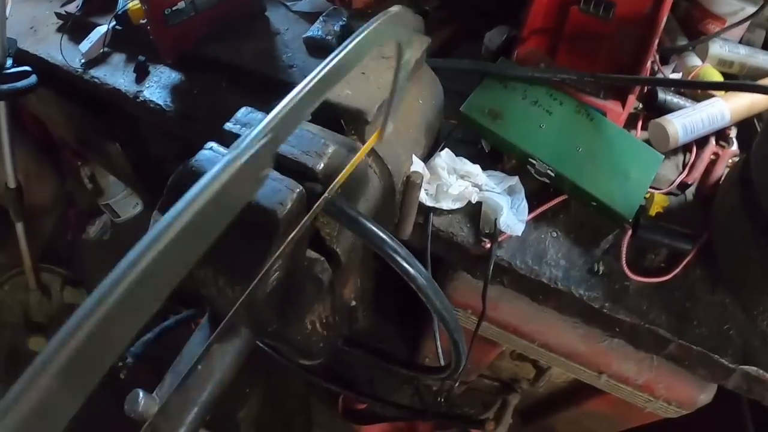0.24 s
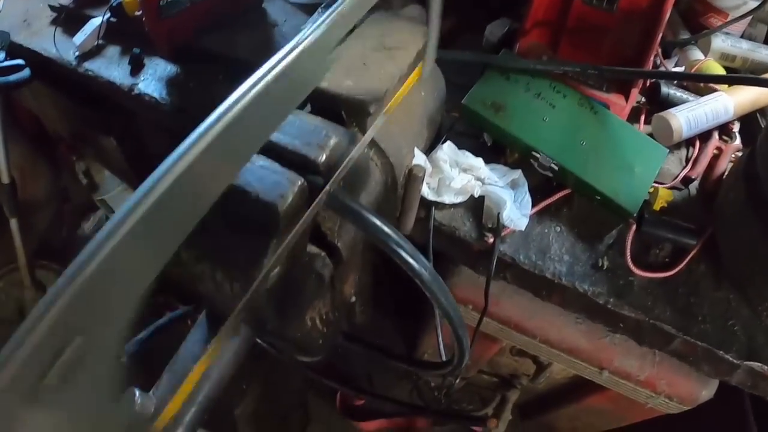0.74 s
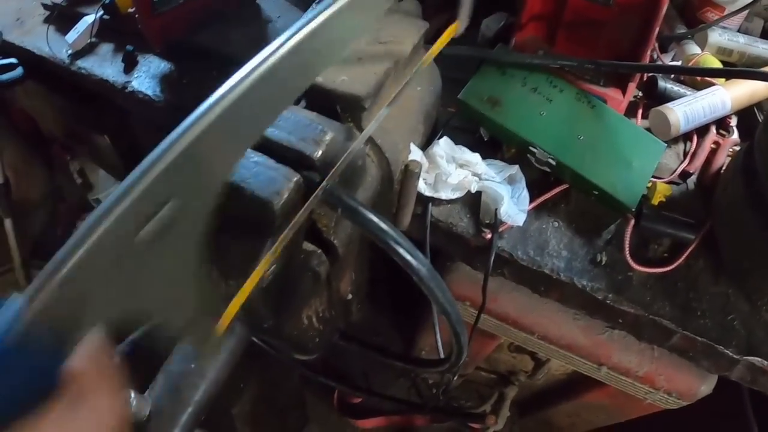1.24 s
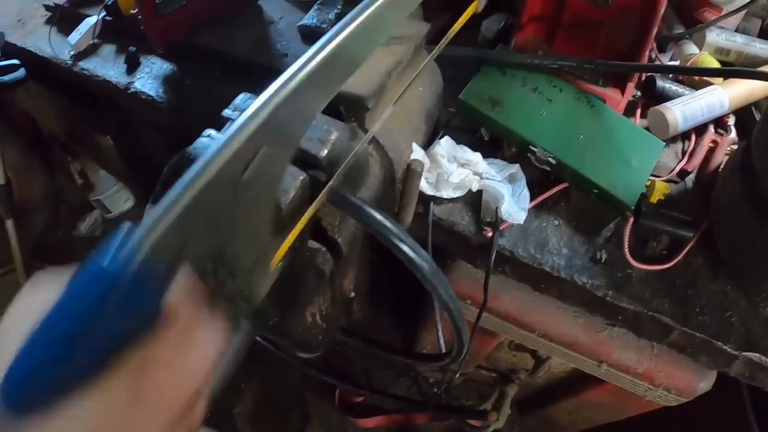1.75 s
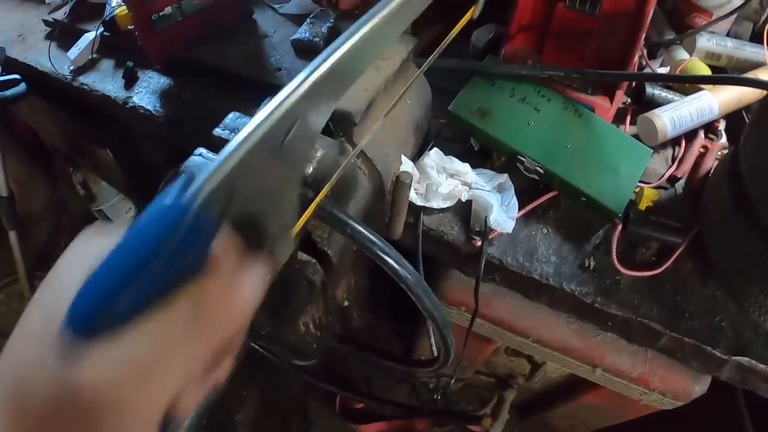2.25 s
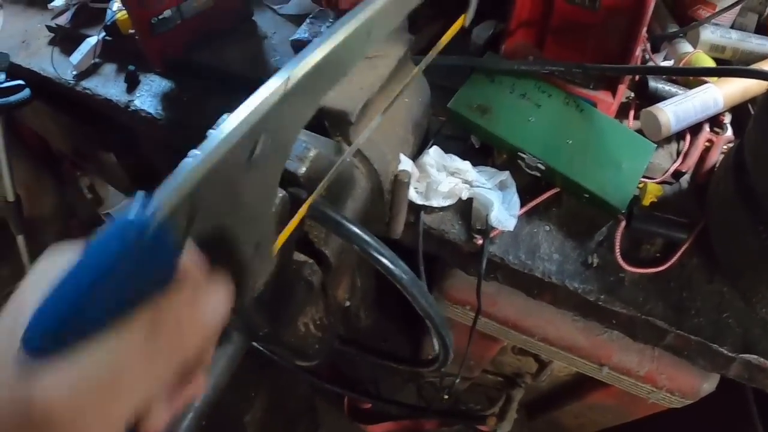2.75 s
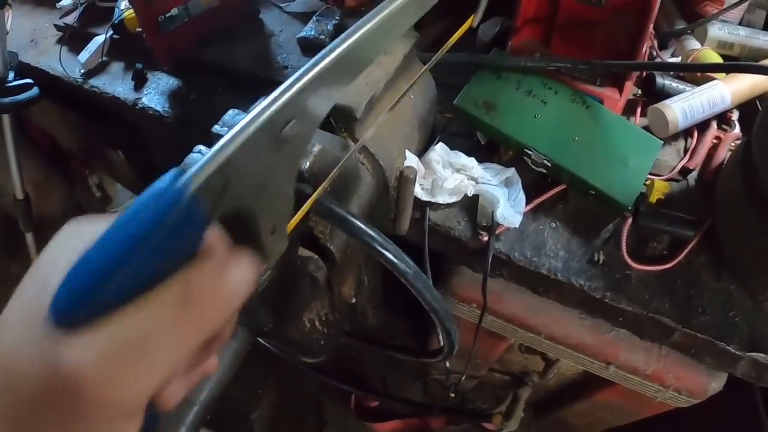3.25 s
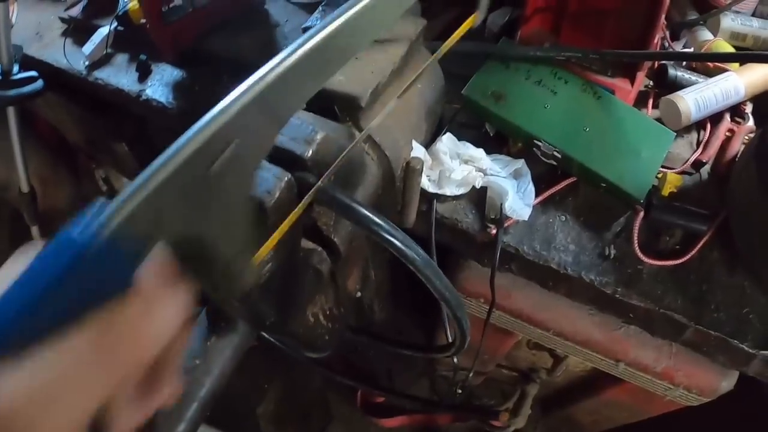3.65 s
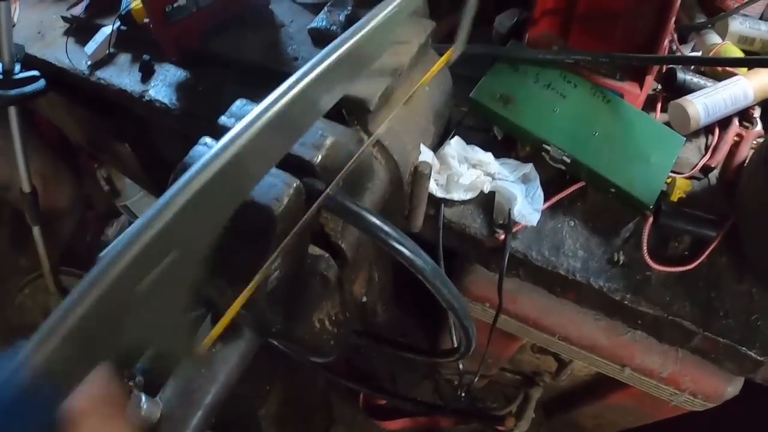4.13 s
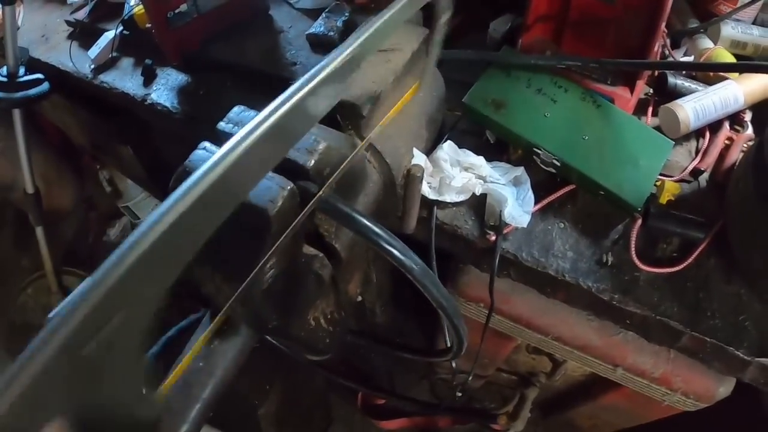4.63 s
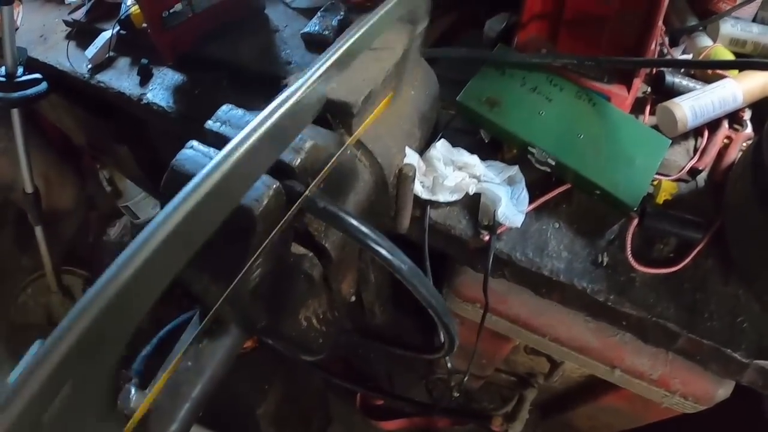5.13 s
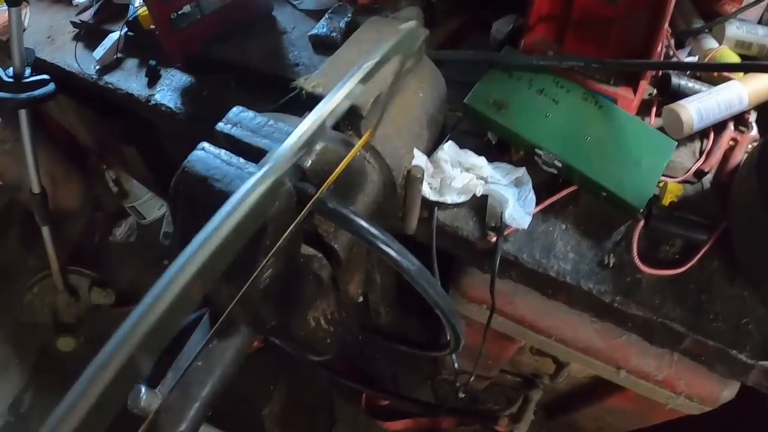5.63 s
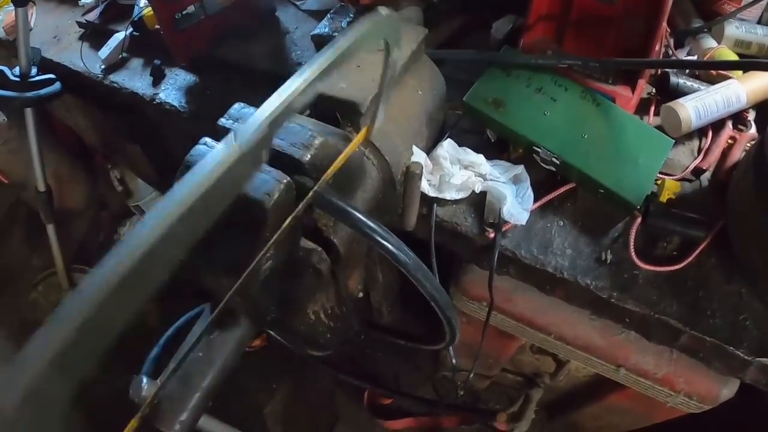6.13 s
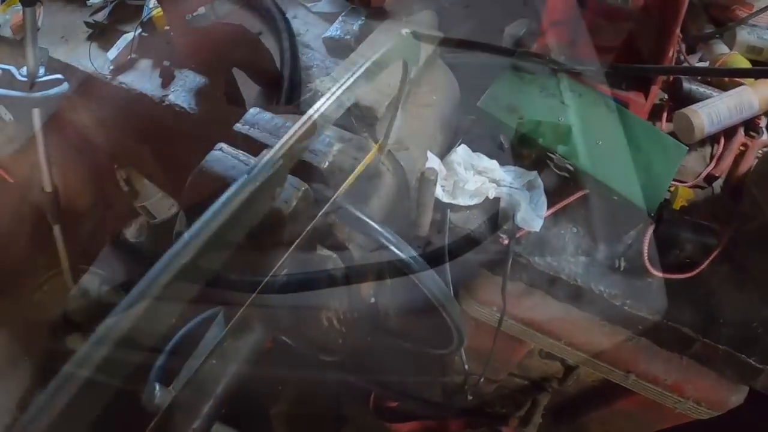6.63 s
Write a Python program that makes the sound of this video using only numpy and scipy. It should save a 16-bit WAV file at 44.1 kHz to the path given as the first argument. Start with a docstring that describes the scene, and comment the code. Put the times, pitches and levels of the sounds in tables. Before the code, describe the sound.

Rapid alternating hacksaw strokes, close and nearly centred, with coarse toothy noise and a singing metallic tone that swells mid-stroke and turns hoarse as it slows. Small snags roughen some pushes; low grinding and shuddering come from the vise and bench. After more than six seconds the sawing breaks off with a low bump, then a flurry of muffled knocks, in a short dry room with faint air.

```python
"""A singing, rasping pull of a hacksaw, then push after pull through a thick cable in a vise, close by in a small workshop.
Each stroke speeds up and slows: noise bursts and partials follow the tooth rate through resonances of blade and frame.
Low noise grinds and rumbles in the bench, and damped sines sway it at the grabs and stalls.
At the end the saw rests; low ringing modes and filtered noise make the dull knocks of handling, one faint knock earlier.
Two microphone channels share the middle; the faces of the blade, the walls and the air spread between them."""
import sys
import numpy as np
from scipy import signal
from scipy.fft import rfft, irfft, next_fast_len
from scipy.io import wavfile
from scipy.ndimage import uniform_filter1d

SR = 44100
rng = np.random.default_rng(int(sys.argv[2]) if len(sys.argv) > 2 else 0)


def wav_record(signal):
    """Record a signal, one row per channel, as 16-bit PCM in the file named by sys.argv[1]."""
    frames = np.transpose(np.atleast_2d(signal))
    bounded = np.clip(frames, -1, 1)
    # unit amplitude maps onto the largest positive 16-bit level
    quanta = np.round(bounded * 32767).astype(np.int16)
    wavfile.write(sys.argv[1], SR, quanta)


N = 303408
TIME = np.arange(N) / SR

# resonances and notches of the tensioned blade and its frame: centre_hz, width_hz, rise_db
BLADE_MODES = [(230, 31.5, 8.5), (329, 26, -26), (418, 38, 12.5), (444, 62, -5.5), (670, 42, 9.5),
               (937, 14, 5.5), (1217, 20.4, 14), (1417, 170, -4), (1670, 117, 2), (1819, 53, 6.5),
               (1980.4, 37, 21.5), (2234, 28.4, 14.5), (2522, 66.5, 12.5), (2625, 58, 8), (3470, 66, 6),
               (3707, 150, 6.5), (4453, 570, 8), (5580, 62, 7), (6005, 83, 5.5), (7744, 334, 10.5),
               (9680, 1010, 9.5), (12860, 1840, 7.5)]
# forward strokes, levels before later shading:
# start_s, fastest_s, end_s, top_tooth_rate_hz, pressure_db, singing_db, squeal_db, bench_jolt_db
PUSHES = [(0.208, 0.332, 0.46, 1684, -24.5, -3.5, -10, -39),
          (0.742, 0.895, 1.046, 1656, -25.5, -10, -7.5, -28),
          (1.29, 1.433, 1.597, 1384, -23.5, -9.5, -9, -38), (1.833, 1.968, 2.11, 1611, -22, -2, -5.5, -32),
          (2.355, 2.481, 2.658, 1746, -25.5, -1, -6.5, -43),
          (2.866, 2.998, 3.15, 1654, -24, -4.5, -6.5, -47), (3.386, 3.534, 3.656, 1739, -24, -3, -13, -32),
          (3.907, 4.069, 4.182, 1627, -25.5, -8, -9, -38), (4.446, 4.586, 4.688, 1886, -27, -0.5, -3, -69),
          (4.963, 5.089, 5.253, 1749, -25, -6, -7.5, -29.5),
          (5.482, 5.635, 5.754, 1725, -24, 0.5, -3.5, -31.5),
          (6.021, 6.167, 6.36, 1706, -27, -1.5, -5, -37), (6.57, 6.627, 6.712, 700, -24, -17, -10, -59)]
# return strokes, likewise: start_s, fastest_s, end_s, top_tooth_rate_hz, pressure_db, singing_db, squeal_db
PULLS = [(-0.074, 0.058, 0.17, 1721, -24, 2, -6), (0.451, 0.589, 0.69, 1691, -23, -2, -8),
         (0.997, 1.145, 1.236, 1580, -23, 1.5, -4), (1.547, 1.681, 1.809, 1482, -21.5, 2, -10),
         (2.082, 2.186, 2.312, 1705, -22.5, -0.5, -5.5), (2.605, 2.728, 2.826, 1840, -24.5, -6, -8),
         (3.115, 3.235, 3.345, 1661, -21, -1.5, -4), (3.624, 3.761, 3.875, 1745, -23, -2, -8.5),
         (4.16, 4.286, 4.398, 1718, -21.5, -0.5, -9.5), (4.696, 4.82, 4.923, 1798, -23.5, -7, -1.5),
         (5.211, 5.336, 5.46, 1791, -24, -4, -7.5), (5.738, 5.876, 5.986, 1808, -24.5, 4, 2.5),
         (6.289, 6.403, 6.523, 1624, -27, -4, -46)]


def undb(db):
    """Decibels to gain."""
    return 10 ** (np.asarray(db) / 20)


def unit(x):
    """Scale to rms 1."""
    return x / np.sqrt(np.mean(x ** 2))


def walk(rate):
    """Smooth chance, about rate changes a second, spread 1."""
    width = max(int(SR / rate), 1)
    smooth = uniform_filter1d(rng.standard_normal(N), width)
    return unit(uniform_filter1d(smooth, width))


def colour(x, points, modes=()):
    """Causal minimum-phase filter from a broad (Hz, dB) shape with resonances on top."""
    size = 8192
    f = np.arange(size // 2 + 1) * SR / size + 1
    hz, db = np.transpose(points)
    shape = np.interp(np.log(f), np.log(hz), db)
    for centre, width, rise in modes:
        bell = 1 / (1 + (2 * (f - centre) / width) ** 2)
        shape = shape + 10 * np.log10(1 + (undb(rise) ** 2 - 1) * bell)
    # folding the cepstrum forward in time makes the filter causal
    cepstrum = irfft(np.log(undb(shape)))
    cepstrum[1:size // 2] *= 2
    cepstrum[size // 2 + 1:] = 0
    response = irfft(np.exp(rfft(cepstrum)))
    return signal.fftconvolve(x, response)[:len(x)]


def add(track, start, sound):
    """Mix a sound in at a time in seconds."""
    i = int(start * SR)
    track[i:i + len(sound)] += sound[:max(N - i, 0)]


def air(air_db=-53):
    """Still workshop air: faint noise, slowly wavering, mostly alike on both sides."""
    # spectrum before levelling: frequency_hz, density_db
    air_shape = [(25, -33), (60, 7), (150, 8.5), (400, 4.5), (1000, -4), (2500, -4), (6000, -7.5),
                 (10000, -50), (15000, -78)]
    mid, side = (unit(colour(rng.standard_normal(N), air_shape)) for _ in range(2))
    return undb(air_db + walk(1)) * (mid + 0.33 * side * np.array([[1], [-1]]))


def workshop(mid, side, t60=0.38, wet_db=-19, width_db=-6):
    """The cluttered walls add a short, faint tail of decaying noise; t60 in seconds."""
    # the hand shades the treble on the left: frequency_hz, left_minus_right_db
    hand_shade = [(60, -1), (300, 0.5), (700, -1.5), (1290, 0), (2380, 2.04), (4400, 1), (8120, -2),
                  (12000, -9.5), (15000, -8)]
    t = TIME[:SR // 2]
    decay = undb(-60 * t / t60) * (t > .004)
    decay_norm = np.sqrt(np.sum(decay ** 2))
    walls = []
    for _ in range(2):
        tail = rng.standard_normal(len(t)) * decay / decay_norm
        walls.append(signal.fftconvolve(mid, tail)[:N])
    mid = mid + undb(wet_db) * walls[0]
    side = side + undb(wet_db + width_db) * walls[1]
    channels = []
    for sign in (1, -1):  # left, right
        shade = [(f, sign * db / 2) for f, db in hand_shade]
        channels.append(colour(mid + sign * side, shade))
    return np.array(channels)


def rumble(hz, place, rumble_db=-52, push_db=7, lag_s=0.18):
    """The vise passes the effort to the bench, which rumbles on through the turns and more under a push."""
    # the cut moves from tip to handle only on a push
    switches = (hz > 1, np.gradient(place) < 0)
    sawing, pushing = (uniform_filter1d(1. * on, int(lag_s * SR)) for on in switches)
    shape = [(25, 0), (50, 5), (80, 2), (110, 12.5), (170, -7.5), (230, -0.5), (420, -12.5), (1000, -51.5)]
    level = undb(rumble_db + push_db * pushing + 2 * walk(17))
    return sawing * level * unit(colour(rng.standard_normal(N), shape))


def shudders(rise_s=0.012, ring_s=0.024):
    """The bench sways in damped sines as a push grabs, as each stroke stalls, and once as the sawing stops."""
    # delays in s, pitches in Hz before a random detune; levels in dB before the hardness of the cut
    jolt_delay_s, jolt_hz = 0.0396, 50.8
    sways = [(start + jolt_delay_s, jolt_hz, db) for start, *_, db in PUSHES]
    sways += [(6.414, 45.65, -19.5)]  # the last deep bump
    # stalls count from top speed: strokes, delay, pitch, level
    for strokes, delay, pitch, db in (PUSHES, 0.0547, 99.4, -36), (PULLS, 0.095, 71.5, -39):
        sways += [(fastest + delay, pitch, db) for _, fastest, *_ in strokes]
    out, t = np.zeros(N), TIME[:SR // 2]
    swell = (1 - np.exp(-t / rise_s)) ** 2 * np.exp(-t / ring_s)
    swell = swell / swell.max()
    for start, pitch, db in sways:
        detune = 1 + 0.054 * rng.standard_normal()
        add(out, start, undb(db) * swell * np.sin(2 * np.pi * pitch * detune * t))
    return out


def handling(ring_db=-3, thud_db=11, thud_s=0.03, scuff_s=0.045, scuff_db=-3, contact_s=0.0015):
    """Soft blows ring a few low modes, with a noisy thud and a short scuff of rubber on steel."""
    # dull knocks of saw and cable, levels before the settings above: start_s, level_db, relative_scuff_db
    blows = [(2.596, -35, -19), (6.461, -16.5, -49), (6.670, -25.5, 0), (6.686, -12, -10),
             (6.694, -20, -4.5), (6.703, -33, -21), (6.721, -16, -31), (6.735, -19, -36), (6.75, -18, -30),
             (6.776, -26.5, -17), (6.816, -26, -9.5), (6.846, -17.5, -17), (6.852, -18.5, -10),
             (6.867, -16, -10.5)]
    # what the knocks ring with, before a random detune: pitch_hz, level_db, t60_s
    blow_modes = [(62, -15, 0.092), (115, -8, 0.073), (189, 4.5, 0.07), (217, 0, 0.045), (331, -2.5, 0.037),
                  (400.8, -8, 0.031), (536, -9, 0.027), (752, -11, 0.059)]
    ring, thud, scuff = np.zeros((3, N))
    t = TIME[:SR // 3]
    contact = 1 - np.exp(-t / contact_s)
    for start, db, rub_db in blows:
        detune = 1 + 0.036 * rng.standard_normal(len(blow_modes))
        tone = 0
        for (pitch, mode_db, t60), shift in zip(blow_modes, detune):
            tone = tone + undb(mode_db - 60 * t / t60) * np.sin(2 * np.pi * pitch * shift * t)
        add(ring, start, undb(db + ring_db) * tone * contact)
        thud_swell = contact * np.exp(-t / thud_s)
        add(thud, start, undb(db + rub_db / 2 + thud_db) * thud_swell * rng.standard_normal(len(t)))
        scuff_swell = contact * np.exp(-t / scuff_s)
        add(scuff, start, undb(db + rub_db + scuff_db) * scuff_swell * rng.standard_normal(len(t)))
    thud_shape = [(25, -15), (70, 17.5), (220, 6.0), (480, 4.5), (1000, -10.5), (3000, -16.5), (9000, -46.0)]
    scuff_shape = [(100, -17), (700, 2), (2000, 3.5), (4500, -4.0), (8000, -11), (15000, -61)]
    return ring + colour(thud, thud_shape) + colour(scuff, scuff_shape, [(1860, 59, 8.2)])


def arm(turn_s=0.0252, lean_at=0.093, sing_fade_db=-6):
    """Half swings of the arm give tooth rate, pressure, singing, squeal and place of cut (1 tip, -1 handle)."""
    # lean: pressure in dB early and late in a stroke against mid-stroke, for push and for pull
    push_lean_db, pull_lean_db = (4.5, -8), (0.5, 1.5)
    strokes = [(*row[:7], push_lean_db, 1) for row in PUSHES]
    strokes += [(*row, pull_lean_db, -1) for row in PULLS]
    hz, pressure, singing, squealing, place = np.zeros(N), [], [], [], []
    for start, fastest, end, top_hz, db, sing_db, squeal_db, (early, late), side in sorted(strokes):
        gather_s, slow_s = fastest - start, end - fastest
        swing = np.interp(TIME, [start, fastest, end], [-1, 0, 1])
        hz += top_hz * np.cos(swing * np.pi / 2)
        pressure += [(start + lean_at * gather_s, db + early), (fastest, db)]
        pressure += [(end - lean_at * slow_s, db + late)]
        # the teeth sing while the blade gathers speed and turn hoarse as it slows
        singing += [((start + fastest) / 2, sing_db), (fastest, sing_db)]
        singing += [(end - slow_s / 3, sing_db + sing_fade_db)]
        squealing += [(start, squeal_db), ((fastest + end) / 2, squeal_db)]
        place += [(start, side), (fastest, 0)]
    hz = np.abs(uniform_filter1d(hz, int(turn_s * SR)))
    curves = (pressure, singing, squealing, place)
    return [hz] + [np.interp(TIME, *np.transpose(points)) for points in curves]


def snags(snag_s=0.042, catch_s=0.011, catch_share=0.23):
    """Force in dB: a tooth catches on a strand for an instant, rips through it and eases off."""
    # the blade breaks loose or snags (a negative jump lowers the force): start_s, force_jump_db
    strand_catches = [(0.517, 1), (0.773, 5.5), (1.056, 1), (1.333, 6.5), (1.863, 0), (2.135, -2),
                      (3.435, 4.5), (3.958, 7), (5.009, 0), (5.509, 2), (5.805, 3), (6.072, 6)]
    jumps, t = np.zeros(N), TIME[:SR // 5]
    for start, db in strand_catches:
        add(jumps, start, db * np.exp(-t / snag_s))
        # just before the jump the force leans the opposite way
        catch = np.interp(start - TIME, [0, catch_s, 2 * catch_s], [1, 1, 0], left=0)
        jumps -= catch_share * db * catch
    return jumps


def caught(waver_db=0.9, loose_s=0.008):
    """Force in dB: it wavers, and is held back while the blade is caught at the turns, longer on a push."""
    force = waver_db * walk(47)
    # strokes, hold in s to either side of the turn, force in dB
    for strokes, hold_s, db in (PUSHES, 0.019, -7), (PULLS, 0.017, -4.5):
        for start, *_ in strokes:
            hold = np.interp(TIME - start, [-hold_s, 0, hold_s, hold_s + loose_s], [0, 1, 1, 0])
            force = force + db * hold
    return force


def drag(hz, force_db, grind_db, place, fast_db=-8, tip_db=2.0, drag_load=0.31, stick_hz=260,
         jitter_db=3.5, chatter_db=-10, chatter_hz=650, chatter_width_hz=330):
    """The blade grinds, most when slow and pressed hard; single teeth then chatter in a low glide."""
    moving = hz ** 2 / (hz ** 2 + stick_hz ** 2)
    db = grind_db + tip_db * place + drag_load * (force_db - force_db.mean())
    shape = [(25, -16), (60, 0), (110, 7), (170, -3.0), (420, 2.0), (600, -6.5), (850, -3.5),
             (1100, -9.5), (2500, -36), (8000, -36)]
    rough = rng.standard_normal(N) * undb(jitter_db * walk(140))
    grind = unit(colour(rough, shape, BLADE_MODES)) * undb(fast_db * (hz / hz.max()) ** 2)
    glide = np.exp(2j * np.pi * np.cumsum(hz) / SR)
    chatter = np.real((1 + walk(160) + 1j * walk(180)) * glide)
    near_chatter = np.exp(-((hz - chatter_hz) / chatter_width_hz) ** 2)
    return moving * undb(db) * (grind + undb(chatter_db) * chatter * near_chatter)


def scrape(speed, phase, speed_power=1.1, brighten=0.36, patchy_db=3.5, grain_db=0.57, gate=0.79):
    """Each tooth scrapes a burst of noise, brighter with speed; the sliding contact favours ever other bands."""
    tooth = np.abs(phase / (2 * np.pi)).astype(int)
    grain = undb(grain_db * rng.standard_normal(N // 10))[tooth]
    noise = unit(rng.standard_normal(N) * (1 + gate * np.cos(phase)) * grain)
    bursts = rfft(noise, next_fast_len(N + 1, True) * 2)
    # octaves from 2 kHz; all below 500 Hz joins the lowest band
    octave = np.log2(np.maximum(np.linspace(0, SR / 2, len(bursts)), 500) / 2000)
    out = 0
    for centre in np.arange(-2, 3.1, 1 / 3):
        band = irfft(bursts * np.clip(1 - 3 * np.abs(octave - centre), 0, 1))[:N]
        out = out + band * speed ** (speed_power + brighten * centre) * undb(patchy_db * walk(47))
    return out


def teeth(phase, speed, scatter=1.0, fade_db=3.5, brighten=0.19):
    """Partials of the tooth rate; unequal bites blur each one, and the upper ones need more speed."""
    overtones_db = [5.5, -3.5, -6.0, -11]
    out = 0
    for k, db in enumerate(overtones_db):
        bite = 1 + scatter * np.sqrt(k + 1) * (walk(450) + 1j * walk(267))
        partial = np.real(bite * np.exp(1j * (k + 1) * phase))
        out = out + partial * speed ** (brighten * k) * undb(db + fade_db * walk(13))
    return out


def squeal(hz, phase, squeal_db, place, bend_hz=2770, bend_width_hz=380, scatter=1.16, tip_db=12,
           octave_db=-5, broken_db=2.0):
    """The octave of the tooth rate swells, hoarse and broken, near the blade's bending resonance and tip."""
    near_bend = np.exp(-((2 * hz - bend_hz) / bend_width_hz) ** 2)
    swell = near_bend * undb(octave_db + squeal_db + tip_db * place + broken_db * walk(100))
    return swell * np.real((1 + scatter * (walk(790) + 1j * walk(550))) * np.exp(2j * phase))


def saw(hz, force_db, singing_db, squeal_db, place, sing_power=0.79, wobble=.018, set_depth=0.12,
        rasp_db=2.5, sing_db=-10, sing_load=0.56, tear_db=-5, tear_power=1.76, spread_db=1):
    """Teeth strike the copper strands one after another and ring the blade; gives mid and side."""
    # broad response of blade, cable and vise: frequency_hz, gain_db
    saw_shape = [(30, -9), (60, -8), (160, -24.5), (560, -20.5), (1000, -12), (1650, -1), (2300, -14),
                 (2900, 2), (4100, -13), (6500, -7.5), (8500, -21.5), (11000, -32), (14000, -35),
                 (15500, -52)]
    speed = hz / 1700
    phase = 2 * np.pi * np.cumsum(hz * (1 + wobble * walk(45.27))) / SR
    # the teeth are set in a wave, so the bite throbs every 14 teeth
    wave = np.cos(phase / 14 + .8 * walk(25))
    # a slow blade still chatters from tooth to tooth, until it sticks
    moving = hz ** 4 / (hz ** 4 + 260 ** 4)
    load = moving * undb(force_db.mean() + sing_load * (force_db - force_db.mean()))
    singing = teeth(phase, speed) * speed ** sing_power * undb(sing_db + singing_db)
    # loose strands meet the teeth out of step: a hoarse band that follows the tooth rate
    out_of_step = np.real((walk(620) + 1j * walk(840)) * np.exp(1j * phase))
    tearing = out_of_step * speed ** tear_power * undb(tear_db)
    rub = undb(rasp_db + force_db) * (1 + 0.048 * wave)
    bites = singing + tearing + squeal(hz, phase, squeal_db, place)
    bites = bites * load * (1 + set_depth * wave)
    mid = colour(bites + rub * scrape(speed, phase), saw_shape, BLADE_MODES)
    # the two faces of the blade radiate their treble separately
    side = colour(undb(spread_db) * rub * scrape(speed, phase), saw_shape, BLADE_MODES)
    side_shape = [(60, -9), (250, -8), (600, -9.5), (1500, -16.5), (2600, -12.5), (4500, -9.0),
                  (8000, -5.5), (13000, -1.5)]
    return mid, colour(side, side_shape)


def scene(snag_grind=0.91, sway_share=0.66):
    """Saw, bench and handling in the workshop; snags grind low, and the bench sways more where the cut is hard."""
    # the blade grinds hardest in the thick middle of the cable, before force and place: time_s, level_db
    grind_curve = [(0, -41), (1.1, -44), (2.2, -39.5), (4.2, -40), (5.6, -39.5), (6.6, -46)]
    hz, pressure_db, singing_db, squeal_db, place = arm()
    snag_db = snags()
    grind_db = np.interp(TIME, *np.transpose(grind_curve))
    force_db = pressure_db + caught() + snag_db
    mid, side = saw(hz, force_db, singing_db, squeal_db, place)
    sway = shudders() * undb(sway_share * (grind_db - grind_db.mean()))
    grinding = drag(hz, force_db, grind_db + snag_grind * snag_db, place)
    bench = grinding + rumble(hz, place) + sway
    return workshop(mid + bench + handling(), side) + air()


def record(dry, limit_db=-16.5, follow_s=0.0033, top_hz=15650):
    """A limiter, shared by both channels, holds down the loudest bites; a steep low-pass cuts the top."""
    power = uniform_filter1d(np.mean(dry ** 2, axis=0), int(follow_s * SR))
    loudness = power / undb(limit_db) ** 2
    gain = (1 + np.abs(loudness) ** 2) ** -.25
    low_pass = signal.ellip(10, .2, 80, top_hz, fs=SR, output="sos")
    return signal.sosfilt(low_pass, dry * gain)


dry = scene()
out = record(dry)
wav_record(out)
```